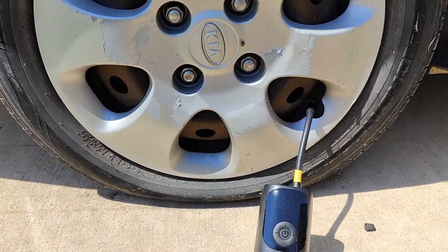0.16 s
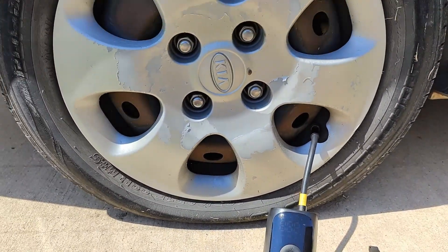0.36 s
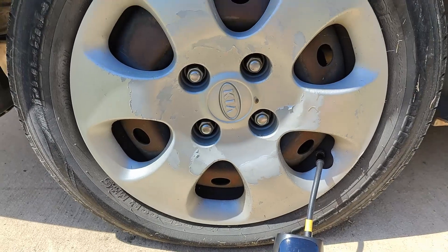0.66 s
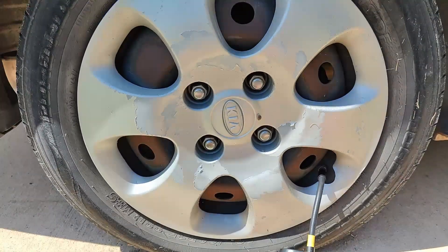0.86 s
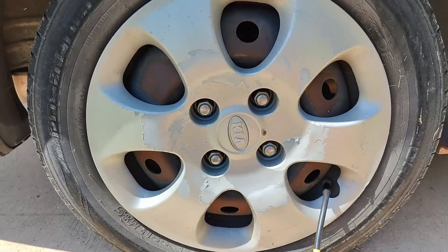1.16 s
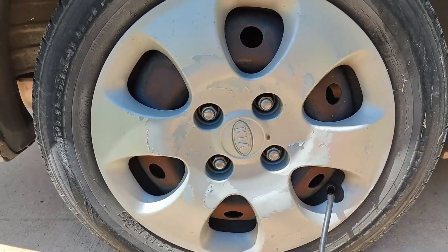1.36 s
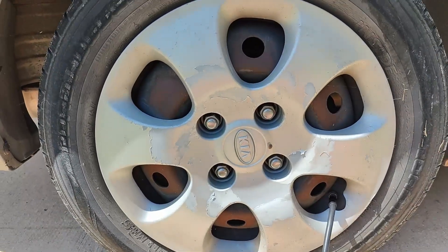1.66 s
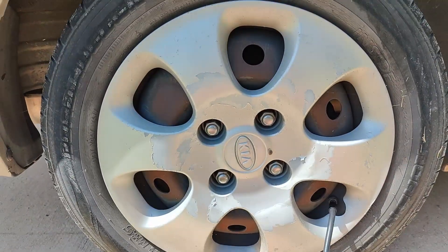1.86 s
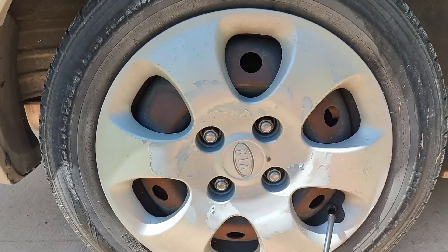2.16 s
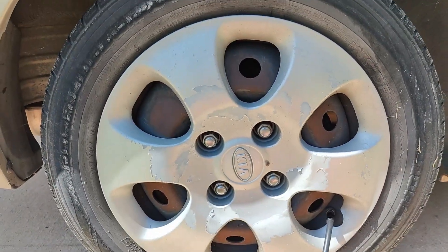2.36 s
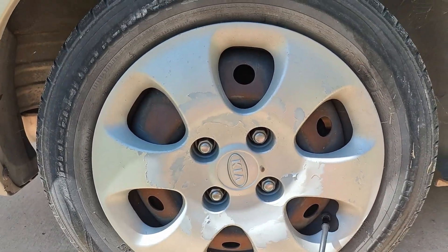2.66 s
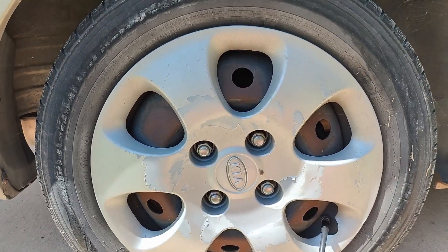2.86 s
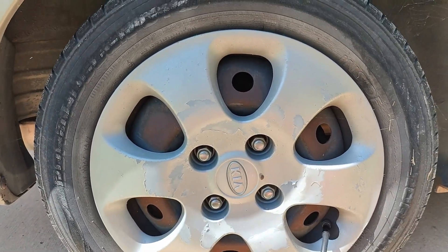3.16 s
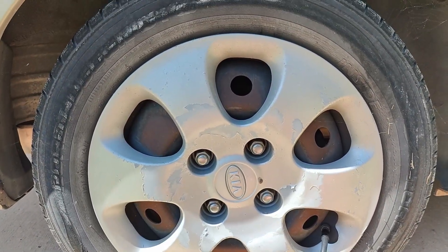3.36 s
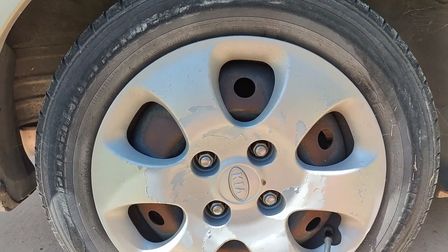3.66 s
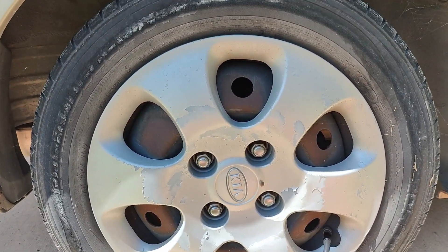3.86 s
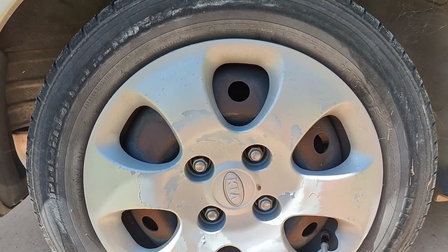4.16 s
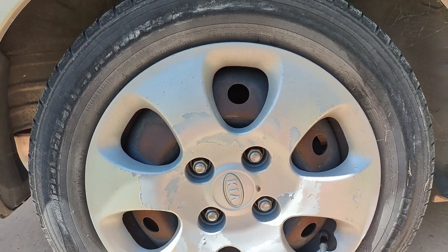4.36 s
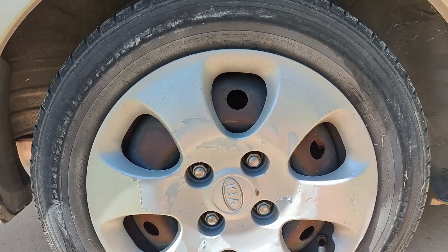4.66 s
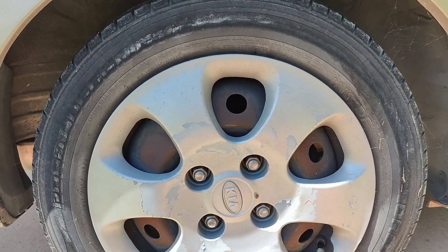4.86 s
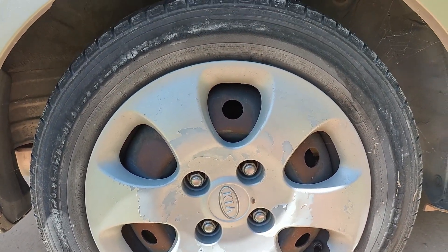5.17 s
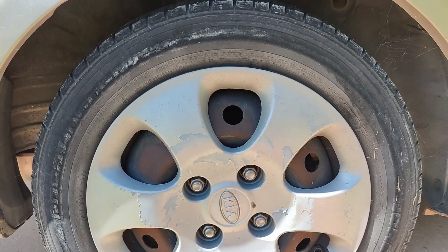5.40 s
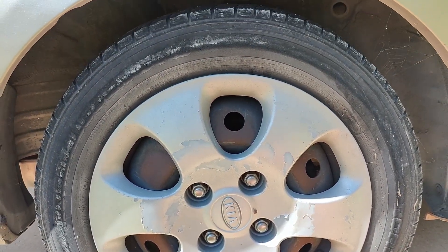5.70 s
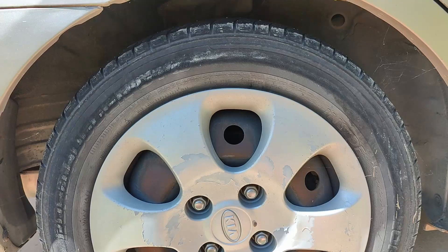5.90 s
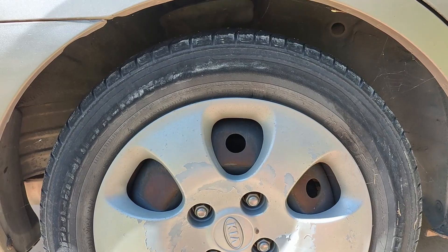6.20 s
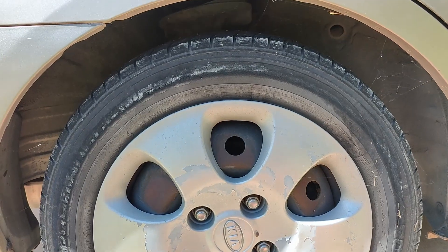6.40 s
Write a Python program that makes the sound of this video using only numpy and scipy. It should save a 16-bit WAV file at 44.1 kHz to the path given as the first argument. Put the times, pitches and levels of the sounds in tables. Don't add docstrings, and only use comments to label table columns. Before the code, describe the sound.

A small electric tire pump runs without a break, very close to a handheld stereo microphone on a paved drive. Rapid piston strokes fuse into a rough, low buzz, with hard plastic-housing clatter, bright gear rattle and airy hiss. The pitch sags barely under load. The tone shifts slightly as the microphone moves up past the wheel, with a faint soft bump midway.

```python
import sys
import numpy as np
from scipy import signal
from scipy.fft import rfft, irfft, next_fast_len
from scipy.io import wavfile
from scipy.ndimage import uniform_filter1d

SR = 44100
rng = np.random.default_rng(int(sys.argv[2]) if len(sys.argv) > 2 else 0)


def undo_db(level):
    steps = np.asarray(level, float) / 20
    return 10 ** steps


def put_to_file(sound):
    columns = np.atleast_2d(sound).T
    safe = np.clip(columns, -1, 1)
    whole_steps = np.round(safe * 32767)
    wavfile.write(sys.argv[1], SR, whole_steps.astype(np.int16))


N = 288404

# (time [s], crank speed [turns/s])
CRANK_SPEED = [(0, 51.465), (.69, 51.493), (1.02, 51.455), (1.61, 51.491), (2.85, 51.364), (3.05, 51.389),
               (3.88, 51.365), (4.11, 51.31), (4.77, 51.244), (4.97, 51.297), (5.59, 51.182),
               (5.79, 51.072), (6.34, 51.138), (6.54, 51.207)]
# (crank angle [turns], thud, low, middle and high housing modes [dB each])
KNOCKS = [(0.0497, 11, -12, 1, -25), (0.1225, -39, -8.5, -5.5, -46), (0.2749, 11.5, -45, -32, -14.5),
          (0.3506, -45, -10.5, 22.5, -4.5), (0.4293, 6, -16, -44, -2.5), (0.4854, 13.5, -14.5, 18.5, -7),
          (0.5953, -45, -2, -9.5, 1), (0.631, 11.5, 1.05, -18, 0.4), (0.6938, 7, -2, 3.5, 0.5),
          (.779, 13, -10, 9, -2.5), (0.846, 16, -2, -36, -8.5), (0.9284, 5, -47, -42, -29)]
GROUP_EDGES_HZ = [650, 1470, 2550]
# (pitch [Hz], time to fall 60 dB [s], left [dB], right [dB], right delay [ms])
HOUSING_MODES = [(102.4, 0.022, -40.5, -42.5, -0.13), (226, 0.032, -47.5, -49, 0.075),
                 (427.2, 0.055, -47, -42, -0.039), (537, 0.0035, -30, -31.5, -0.14),
                 (792.2, 0.011, -23.5, -21, -0.18), (973, 0.096, -44, -38, -0.55),
                 (1141, 0.014, -23, -17.5, -0.15), (1437, 0.0097, -32, -31, -0.16),
                 (1472.2, 0.0052, -44, -37, -0.081), (1857.6, 0.024, -43.5, -41, -0.086),
                 (2172.3, 0.024, -42.5, -37.5, -0.026), (2397, 0.018, -40, -39.5, -0.05),
                 (2622, 0.026, -35.5, -29.5, -0.48), (2996, 0.0028, -17, -27.5, -0.027),
                 (3483, 0.01, -19, -26, -0.082), (3928, 0.031, -28.5, -35.5, -0.064),
                 (4350, 0.0062, -29, -31.5, -0.157), (5060, 0.016, -39, -39, 0.196)]
WOBBLE_DB = [.4, 3.2, 1.5, 1.4]
# (multiple of crank speed, level [dB], crank angle [turns])
PISTON_ROCKING = [
    (1, -39, 0.54),
    (2, -36, 0.013),
]
# (crank angle [turns], gear case, cover, valve plate and reed [dB each])
SHOVES = [
    (.01, 1, 2, -6, -4),
    (.38, 1, 8, 7, 0),
    (.45, 3, 4, 10, 3),
    (.55, 6, 4, 2, 4),
    (.64, 5, 5, 7, 5),
    (.71, 2, 2, -2, 8),
    (.87, 5, 8, -4, -1),
]
# (low [Hz], high [Hz])
PART_EDGES_HZ = [(3000, 7700), (7700, 10300), (10300, 12500), (12500, 17000)]
# (frequency [Hz], level [dB])
RATTLE_SPECTRUM = [(5000, -11.5), (5700, -17), (6800, -5), (7400, -11), (7700, -20), (8600, -10),
                   (9250, -18), (9650, -14.5), (10700, -23), (11200, -12), (12000, -24), (14200, -18.5),
                   (15400, -7.5), (16200, -14)]
# (frequency [Hz], level [dB])
WHIR_SPECTRUM = [(30, -24), (60, -5), (150, -10), (380, -17), (780, -6), (1080, 1), (1300, -6), (1950, 2.5),
                 (2500, -5), (2900, -11), (3350, -9.5), (3700, -17), (4200, -11), (5600, -16)]
# (frequency [Hz], likeness [0-1])
PORT_LIKENESS = [(30, 0.9), (300, 0.69), (1000, 0.4), (2200, 0.52), (3500, 0.18), (6000, 0.48),
                 (10000, 0.29), (15000, 0.18)]
# (frequency [Hz], left minus right [dB])
PORT_BALANCE = [(700, 0), (1450, -6), (2000, -2), (2900, 4), (3700, 8), (4800, 1), (6600, -18), (7700, -7),
                (8600, -11), (10700, -3), (11200, -8), (12200, 1), (13000, -6), (14200, -27)]
# (time [s], height [0-1], turn toward the wheel [-1 to 1])
HAND = [
    (0, 0, -0.43),
    (.55, 0.24, -.8),
    (.9, 0.27, 0.93),
    (1.6, 0.3, .9),
    (2.3, 0.44, 0.58),
    (3, 0.62, 0.4),
    (4.4, 0.6, -0.068),
    (5.6, 0.98, -0.81),
    (6.54, 0.97, -0.73),
]
# [left dB, right dB]
LIFT_RATTLE_DB = [-2.5, 1]
# [left dB, right dB]
LIFT_ECHO_DB = [-1, 11.5]
# (low [Hz], high [Hz], full turn [dB], full lift [dB])
REFLECTED = [(980, 1010, -0.9, 1.5), (1080, 1180, 1, -1.5), (2550, 2800, .1, 4.5), (3360, 3600, 1.5, -1.5),
             (3720, 4200, -2, -0.5), (4380, 4700, 3.5, 12)]
# (frequency [Hz], level [dB])
HUM = [(38, -46), (75, -59), (125, -54), (178, -61)]
# (time [s], level [dB], pitch [Hz], time to fall 60 dB [s])
BUMPS = [
    (3.428, -21, 36, .065),
    (3.405, -36, 110, .1),
    (3.487, -32, 115, .1),
    (3.552, -35, 125, .09),
]

GEAR_RATIO = 60 / 11
LIFT_HOUSING_DB = -0.96


def crank():
    speed = np.interp(np.arange(N) / SR, *np.transpose(CRANK_SPEED))
    start_turns = 0.0037
    return start_turns + np.cumsum(speed) / SR


def housing(angle):
    table = np.array(KNOCKS)
    turn = np.arange(int(angle[-1]) + 1)[:, None]
    shape = (len(turn), len(table))
    late = 0.0004 * wander(3, (len(turn), 1))
    late = late + 0.0002 * wander(1, shape) + 0.0003 * wander(60, shape)
    place = turn + table[:, 0]
    wobble = np.cos(2 * np.pi * (GEAR_RATIO * place + 0.2))
    at = np.interp(place + late + 0.00012 * wobble, angle, np.arange(N), -1, -1)

    out = np.zeros((2, N))
    for hz, t60, left_db, right_db, delay_ms in HOUSING_MODES:
        group = np.searchsorted(GROUP_EDGES_HZ, hz)
        loose = min(hz / 1500, 1)
        vary_db = loose * (0.7 * wander(1, shape) + 0.6 * wander(40, shape))
        vary_db = vary_db + WOBBLE_DB[group] * min(0.01 / t60, 1) * wobble
        force = -undo_db(table[:, 1 + group] + vary_db)
        out[0] += undo_db(left_db) * ring(at, force, hz, t60)
        out[1] += undo_db(right_db) * ring(at + delay_ms * SR / 1000, force, hz, t60)
    low_cut = signal.butter(3, 75, "highpass", fs=SR, output="sos")
    out = signal.sosfiltfilt(low_cut, out)

    lift_pan_db = 0.2
    lift_db = LIFT_HOUSING_DB + np.array([0.5, -0.5]) * lift_pan_db
    return (out + rocking(angle)) * undo_db(np.outer(lift_db, hand(column=1)))


def rocking(angle):
    out = np.zeros(N)
    for multiple, db, turns in PISTON_ROCKING:
        out += undo_db(db) * np.sqrt(2) * np.cos(2 * np.pi * multiple * (angle - turns))
    return out


def ring(at, force, hz, t60):
    fall = np.log(1000) / t60
    pole = np.exp((2j * np.pi * hz - fall) / SR)
    inside = (at >= 0) & (at < N - 1)
    whole = np.ceil(at[inside]).astype(int)
    train = np.zeros(N, complex)
    np.add.at(train, whole, force[inside] * pole ** (whole - at[inside]))
    ringing = signal.lfilter([0, pole], [1, -2 * pole, pole ** 2], train).imag
    return ringing * fall * np.e / SR


def rattle(angle):
    teeth = rng.standard_normal((2, 860))[:, (angle % 1 * 860).astype(int)]
    stroke_db = np.interp(angle, np.arange(0, 340, 0.25), 1.05 * wander(1, 1360))
    wobble_db = 0.66 * np.cos(2 * np.pi * GEAR_RATIO * angle)
    grit = undo_db(1.2 * wander(24, N) + stroke_db + wobble_db)
    loose = rng.standard_normal((2, N))
    noise = np.zeros((2, N))
    cycle = np.arange(1001) / 1000
    bite = 0.2
    for column, edges_hz in enumerate(PART_EDGES_HZ, start=1):
        load = np.interp(angle % 1, cycle, undo_db(load_db(cycle, column)))
        part = (0.5 * teeth * load ** bite + 0.71 * loose) * load * grit
        noise += signal.sosfiltfilt(bandpass(edges_hz), part)
    sound = coloured(noise, [(4200, -56)] + RATTLE_SPECTRUM, -7.5)

    echo = signal.sosfilt(bandpass([8100, 9200]), sound)
    lift = hand(column=1)
    echo_change = undo_db(np.outer(LIFT_ECHO_DB, lift)) - 1
    return sound * undo_db(np.outer(LIFT_RATTLE_DB, lift)) + echo * echo_change


def load_db(angle, column=1):
    slack_db, take_up_turns, ease_off_turns = -7, 0.03, 0.06
    power = undo_db(2 * slack_db)
    for shove in SHOVES:
        since = (angle - shove[0]) % 1
        rise = (1 - np.exp(-since / take_up_turns)) ** 2
        power = power + undo_db(2 * shove[column]) * rise * np.exp(-since / ease_off_turns)
    return 10 * np.log10(power)


def whir(angle):
    noise = rng.standard_normal((2, N)) * undo_db(0.39 * load_db(angle))
    sound = coloured(noise, WHIR_SPECTRUM + [(6500, -30)], -11.5)
    return sound * undo_db(LIFT_HOUSING_DB * hand(column=1))


def coloured(noise, table, level_db):
    size = next_fast_len(N)
    hz = np.fft.rfftfreq(size, 1 / SR)
    a, b = rfft(noise, size)
    same = np.clip(read(PORT_LIKENESS, hz), 0, 1)
    shifted = a * np.exp(2j * np.pi * hz * 0.00009)
    right = same * shifted + np.sqrt(1 - same ** 2) * b
    left = a * undo_db(read(PORT_BALANCE, hz))
    return irfft(np.array([left, right]) * undo_db(read(table, hz) + level_db), size)[:, :N]


def read(points, hz, column=1):
    table = np.transpose(points)
    return np.interp(np.log(hz + 1), np.log(table[0] + 1), table[column])


def wander(count, shape):
    return uniform_filter1d(rng.standard_normal(shape), count, 0) * np.sqrt(count)


def bandpass(edges_hz):
    return signal.butter(2, edges_hz, "bandpass", fs=SR, output="sos")


def hand(column):
    table = np.transpose(HAND)
    curve = np.interp(np.arange(N) / SR, table[0], table[column])
    return curve - curve.mean()


def turned(x):
    out, lift, turn = x.copy(), hand(column=1), hand(column=2)
    for low_hz, high_hz, turn_db, lift_db in REFLECTED:
        band = signal.sosfiltfilt(bandpass([low_hz, high_hz]), x)
        out += band * (undo_db(turn_db * turn + lift_db * lift) - 1)
    return out


def yard():
    t = np.arange(N) / SR
    out = np.zeros(N)
    for hz, db in HUM:
        drift = 0.0045 * np.cumsum(wander(400, N)) / 20
        out += undo_db(db) * np.sqrt(2) * np.sin(2 * np.pi * hz * t + drift)
    for time, db, hz, t60 in BUMPS:
        out += ring(np.array([time * SR]), -undo_db(np.array([db])), hz, t60)
    return out


def scene():
    angle = crank()
    return turned(housing(angle) + whir(angle)) + rattle(angle) + yard()


def roll_off(x):
    return signal.sosfilt(signal.butter(12, 17160, fs=SR, output="sos"), x)


def record(dry):
    cut = signal.sosfilt(signal.butter(2, 22, "highpass", fs=SR, output="sos"), dry)
    edge = signal.firwin(1601, 15830, window=("kaiser", 10), fs=SR)
    mix = signal.oaconvolve(cut, edge[None], "same")
    return roll_off(mix)


dry = scene()
out = record(dry)
put_to_file(out)
```